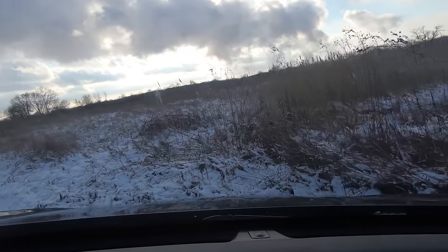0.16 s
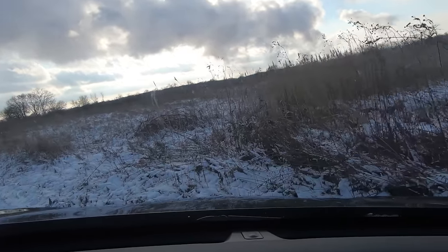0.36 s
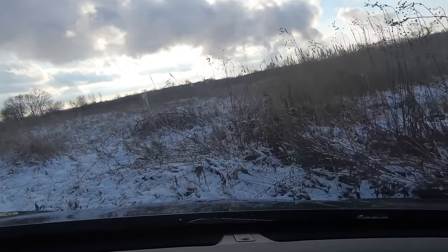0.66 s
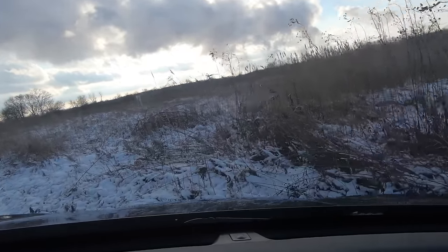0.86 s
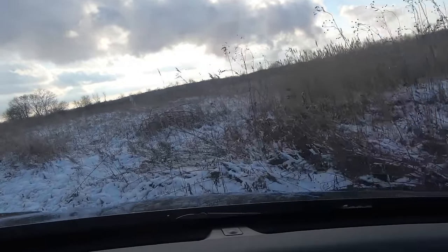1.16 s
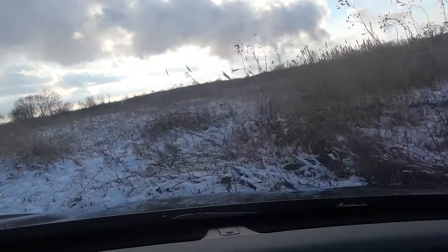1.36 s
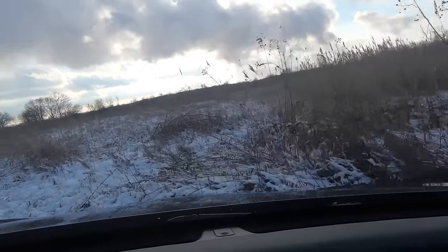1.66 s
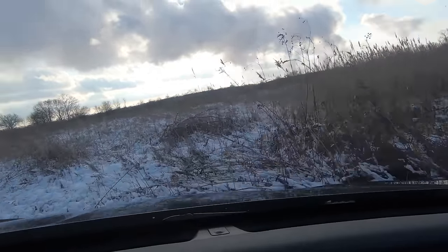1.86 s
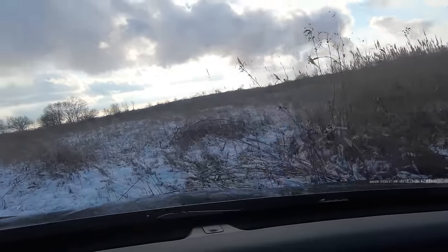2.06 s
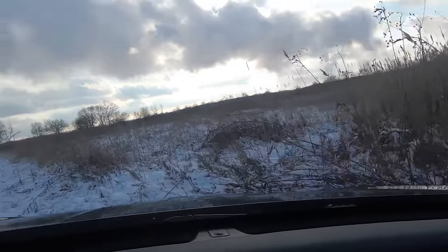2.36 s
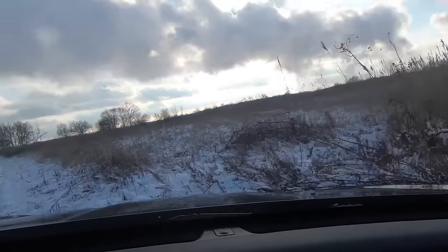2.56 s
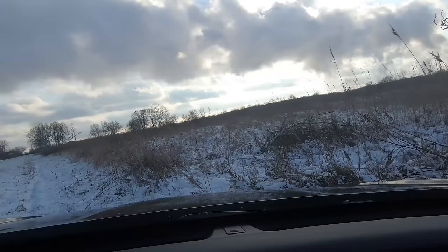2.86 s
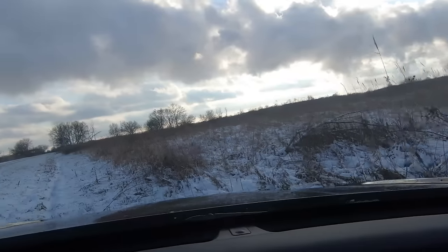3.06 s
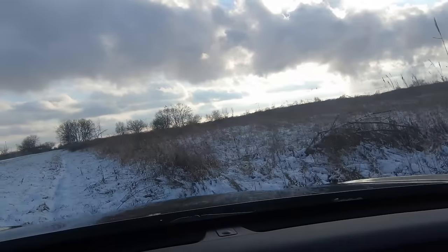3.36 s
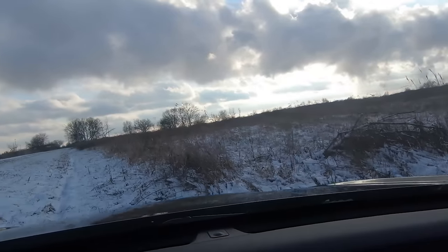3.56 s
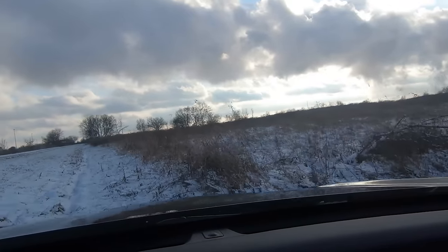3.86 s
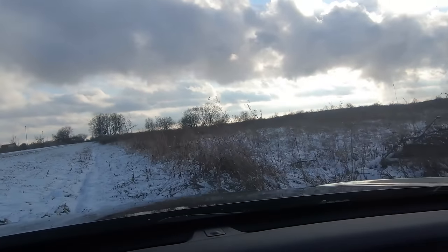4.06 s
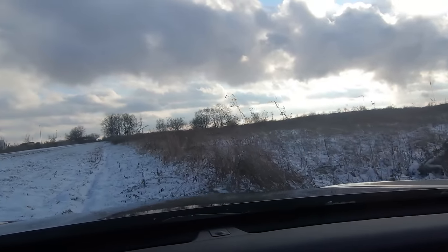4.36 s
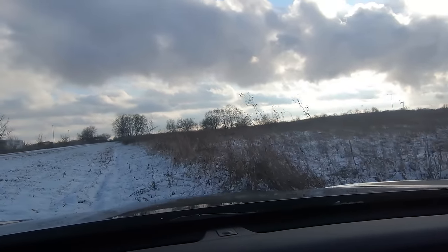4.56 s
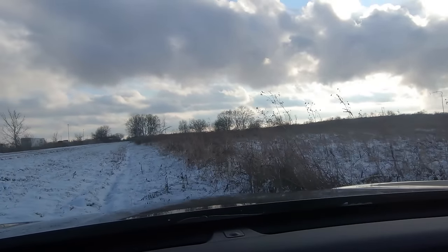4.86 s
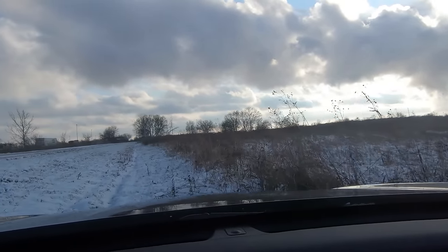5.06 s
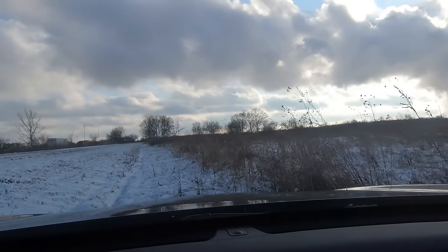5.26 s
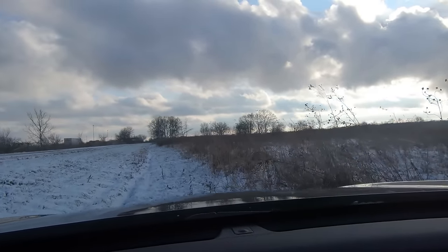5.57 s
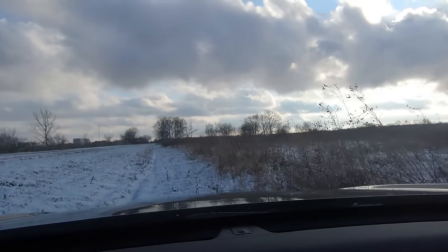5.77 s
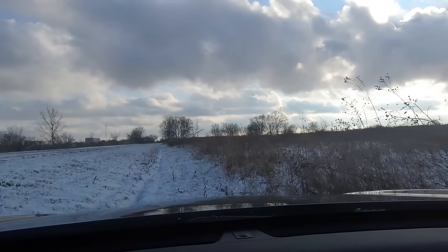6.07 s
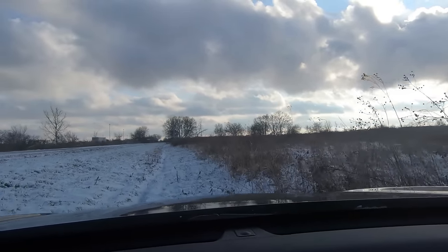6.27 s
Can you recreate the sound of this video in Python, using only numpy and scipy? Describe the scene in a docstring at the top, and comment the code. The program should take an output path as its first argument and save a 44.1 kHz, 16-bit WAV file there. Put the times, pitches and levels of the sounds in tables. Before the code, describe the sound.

Low engine drone and cab rumble as a vehicle creeps through snowy scrub, dry stalks rubbing, then a cluster of hard cracks before it calms.

```python
"""First the low drone of an engine, inside a truck cab creeping over a snowy, weedy track. Crank-order sines
make the drone; shaped noise makes the boom of the cab, the body rumble, the crunch and the swish along the panels.
Over it stalks rub and squeak, bumps ring body modes, and stems crack and tap as noise bursts into panel modes.
Two close microphone ports; taps, squeaks and rubbing are dulled above 8 kHz, all sound is cut above 15.6 kHz."""
import sys
import numpy as np
from scipy import signal
from scipy.fft import rfft, irfft, next_fast_len
from scipy.io import wavfile

SR = 44100
rng = np.random.default_rng(int(sys.argv[2]) if len(sys.argv) > 2 else 0)


def materialize(psi):
    """Save the field psi as 16-bit PCM at rate SR to the path in sys.argv[1].

    A 1-D psi becomes a single channel; in a 2-D psi each row is a channel.
    """
    bounded = np.clip(np.atleast_2d(psi).T, -1, 1)
    quanta = np.round(bounded * 32767).astype(np.int16)
    wavfile.write(sys.argv[1], SR, quanta)


N = 283122   # length in samples
OPPOSITE = np.array([[1], [-1]])   # left port plus, right port minus


def amp(db):
    """Decibels to gain."""
    return 10 ** (np.asarray(db) / 20)


def rms_one(x):
    """Scale to unit rms."""
    return x / np.sqrt(np.mean(x ** 2) + 1e-20)


def power_sum(*levels_db):
    """Level in dB of unrelated sounds heard together: their powers add."""
    return 10 * np.log10(sum(amp(2 * db) for db in levels_db) + 1e-20)


def in_time(rows):
    """Columns of a curve table whose first column is seconds, one value per sample."""
    seconds, *columns = np.transpose(rows)
    return [np.interp(np.arange(N) / SR, seconds, column) for column in columns]


def at_hz(points, hz):
    """Read a table on a log-frequency axis."""
    table_hz, values = np.transpose(points)
    return np.interp(np.log(hz), np.log(table_hz), values)


def drift(rate_hz):
    """Slow random wander of spread 1: noise through two equal poles, made at every 40th sample."""
    step = 40
    r = np.exp(-2 * np.pi * step * rate_hz / SR)
    noise = rng.standard_normal(N // step + 2002)
    slow = signal.lfilter([1], [1, -2 * r, r * r], noise)[2000:]   # skip the filter's start
    return np.interp(np.arange(N) / step, np.arange(len(slow)), rms_one(slow))


def resonance(x, hz, width_hz):
    """Two-pole peak with gain 1 on top."""
    r = np.exp(-np.pi * width_hz / SR)
    top = np.array([1, 0, -1]) * (1 - r * r) / 2
    return signal.lfilter(top, [1, -2 * r * np.cos(2 * np.pi * hz / SR), r * r], x)


def spread(mid, side, alike):
    """Mix two unrelated signals into two ports with the given likeness, -1 to 1."""
    return np.sqrt(1 + alike) * mid + np.sqrt(1 - alike) * side * OPPOSITE


def common_share(alike, spectrum, hz, inside):
    """Share of the power that is left in the mean of the two ports."""
    power = amp(2 * at_hz(spectrum, hz)) * inside
    return np.sum(power * (1 + alike) / 2) / np.sum(power)


# Likeness of the two microphone ports. Each row: pitch in Hz, left-right likeness from -1 to 1.
PORT_LIKENESS = [(60, 1), (99, 0.96), (160, 0.86), (270, 1), (450, 0.8), (740, 0.21), (1220, -0.39),
                 (2010, 0.41), (3330, 0.36), (5500, 0.12), (9080, -0.2), (15000, 0.0068)]
# Balance of the two ports. Each row: pitch in Hz, left minus right in dB.
PORT_TILT = [(60, -0.5), (240, -0.5), (480, -0.5), (950, -1.5), (1890, -2.5), (3770, -4), (6500, 0),
             (8300, -5.5), (10000, -3), (12000, -3), (15000, 0)]


def textured(spectrum, grain_db, grains_per_s):
    """Coloured stereo noise in uneven grains, scaled so that the mean of the ports has an rms of about 1."""
    size = next_fast_len(N)
    hz = np.maximum(np.arange(size // 2 + 1) * SR / size, 1)
    grains = rng.standard_normal((2, N)) * amp(grain_db * drift(grains_per_s))
    mid, side = rfft(grains, size)
    alike = np.clip(at_hz(PORT_LIKENESS, hz), -.99, .999)
    inside = (hz >= spectrum[0][0]) & (hz <= spectrum[-1][0])
    colour = amp(at_hz(spectrum, hz) + at_hz(PORT_TILT, hz) / 2 * OPPOSITE) * inside
    pair = irfft(spread(mid, side, alike) * colour, size)[:, :N]
    return rms_one(pair) / np.sqrt(common_share(alike, spectrum, hz, inside))


def whine():
    """A faint narrow whine: noise through two equal resonances, opposite in the two ports."""
    hz, width_hz, level_db = 1245, 30, -69
    tone = resonance(rng.standard_normal(N), hz, width_hz)
    tone = resonance(tone, hz, width_hz)
    return amp(level_db) * rms_one(tone) * OPPOSITE


# Engine speed. Each row: time in seconds, crank turns per second.
CRANK_SPEED = [(0, 28.5), (.5, 28), (1, 26.9), (1.3, 27.4), (1.6, 30.3), (2, 31.7), (2.4, 33.5),
               (2.8, 35.7), (3.2, 34.8), (3.6, 34.8), (4.2, 34.2), (4.7, 33.6), (5.2, 32.6), (5.8, 32),
               (6.42, 30.8)]
# Engine load. Each row: time in seconds, level in dB.
ENGINE_LOAD = [(0, -35), (.7, -35), (1.3, -40), (1.8, -37.5), (2.2, -37), (2.8, -34.5), (3.4, -36.5),
               (4.2, -39), (5, -39), (5.7, -39.5), (6.42, -42)]
# Engine orders. Each row: multiple of the crank rate, level in dB against the load.
ENGINE_ORDERS = [(1, -4), (2, -3), (3, -2), (4, -1.5), (6, -6.5), (7, -15), (8, -16)]


def engine():
    """Sines on the crank orders, each swelling on its own as the mounts pass it on unevenly."""
    (turns_per_s,), (load_db,) = in_time(CRANK_SPEED), in_time(ENGINE_LOAD)
    unsteady = turns_per_s * (1 + 0.0027 * drift(2.62))
    angle = 2 * np.pi * np.cumsum(unsteady) / SR
    drone = np.zeros(N)
    for order, db in ENGINE_ORDERS:
        swell = amp(load_db + db + 3.04 * drift(1.2))
        drone += swell * np.sin(order * angle + rng.uniform(0, 2 * np.pi))
    return drone


# Lurches of the truck over ruts. Each row: middle in seconds, added boom in dB before the boom trim,
# added rumble in dB.
RUTS = [(0.069, -23.5, -41), (.37, -24, -39), (.85, -47, -63), (1.121, -31, -46), (1.64, -21.5, -57),
        (2.06, -19, -37), (2.34, -21, -51), (2.49, -27, -35.5), (3.159, -45, -27.5), (3.25, -14.5, -35.5),
        (3.55, -21.5, -34), (3.81, -24, -36), (3.91, -39, -32.5), (4.06, -28, -33), (4.44, -21, -47),
        (4.62, -23, -59), (5.49, -43, -58), (5.73, -46, -45), (5.82, -40, -34.5), (6.03, -37, -34.5),
        (6.22, -40, -46)]


def lurches():
    """Each rut swells and fades as a bell: boom and rumble levels in dB."""
    half_width_s = 0.051
    seconds, *levels_db = np.transpose(RUTS)
    bells = np.exp(-((np.arange(N) / SR - seconds[:, None]) / half_width_s) ** 2)
    return 10 * np.log10(amp(2 * np.array(levels_db)) @ bells + 1e-20)


# Ground under the wheels, slow part. Each row: time in seconds, cab boom in dB before the boom trim,
# body rumble in dB, snow crunch in dB.
GROUND_LEVELS = [(0, -31.5, -38.5, -52.5), (.5, -31, -37.5, -52.5), (1, -25.5, -34, -49.5),
                 (1.5, -30, -41, -53), (1.9, -36, -31, -51.5), (2.3, -30, -35, -50), (2.63, -27, -31, -48),
                 (2.8, -29, -31, -44.5), (3, -31.5, -33, -53), (3.4, -24.5, -36, -51), (4, -26, -36.5, -52),
                 (4.4, -29, -35.5, -50), (4.8, -29.5, -32, -52), (5.4, -29, -37.5, -50),
                 (5.9, -34, -34, -55), (6.42, -25, -40, -50)]
# Colours of boom, rumble and crunch. Each row: pitch in Hz, relative density in dB per Hz.
BOOM_COLOUR = [(7.1, -35), (12, -20), (32, -4.5), (45, -2), (59, 7.5), (70, 2), (95, -8.5), (120, -50),
               (210, -120)]
RUMBLE_COLOUR = [(44, -37), (75, 2.5), (92, -8), (129, -4), (156, -6.5), (189, -7.5), (250, -15.5),
                 (323, -21.5), (355, -21.5), (380, -35.5), (490, -46), (840, -120)]
CRUNCH_COLOUR = [(180, -51), (300, 5.5), (318, -8), (355, -0.5), (387, -3), (1080, -15), (1700, -24.5),
                 (2210, -72), (3740, -120)]
# Narrow modes of the truck body. Each row: pitch in Hz, width in Hz, relative level in dB.
BODY_MODES = [(33.8, 4.4, -13), (62.37, 8.7, -0.5), (107.7, 8.2, -4), (187.7, 9.7, -11),
              (220.1, 4.8, -19.5)]
BOOM_TRIM_DB, BODY_DB, LURCH_CRUNCH_DB = -5.5, -38.0, -14   # the last is against the lurch rumble


def ground():
    """The rolling wheels shake the cab air and the body; packed snow crunches above."""
    boom_db, rumble_db, crunch_db = in_time(GROUND_LEVELS)
    lurch_boom_db, lurch_rumble_db = lurches()
    boom_db = power_sum(boom_db, lurch_boom_db) + BOOM_TRIM_DB
    rumble_db = power_sum(rumble_db, lurch_rumble_db)
    crunch_db = power_sum(crunch_db, lurch_rumble_db + LURCH_CRUNCH_DB)
    shake = rng.standard_normal(N)
    modes = np.zeros(N)
    for hz, width_hz, db in BODY_MODES:
        ringing = resonance(resonance(shake, hz, width_hz), hz, width_hz)
        modes += amp(db) * rms_one(ringing)
    return (amp(boom_db) * textured(BOOM_COLOUR, 0.66, 17.0)
            + amp(rumble_db) * textured(RUMBLE_COLOUR, 1.73, 15.0)
            + amp(crunch_db) * textured(CRUNCH_COLOUR, 1.7, 31.0)
            + amp(BODY_DB) * rms_one(modes))


# Weeds and powder along the panels, slow part. Each row: time in seconds, rasp in dB, swish in dB.
BRUSH_LEVELS = [(0, -56.5, -59.5), (.25, -59, -61.5), (.48, -55.5, -58), (.79, -48.5, -51),
                (1.25, -58, -62.5), (1.42, -62, -63.5), (1.96, -57, -58.5), (2.25, -56.5, -54),
                (2.32, -57, -61.5), (2.55, -55, -62), (2.66, -56, -65), (2.73, -54.5, -70),
                (2.8, -48.5, -73), (2.9, -52.5, -59.5), (3.0, -54.5, -58), (3.1, -56.5, -68),
                (3.17, -57, -75), (3.24, -53, -65), (3.32, -56, -55), (3.5, -59, -55.5), (4.02, -53.5, -48),
                (4.3, -60, -64.5), (4.45, -64, -73), (4.66, -63.5, -74), (4.88, -55.5, -56),
                (5.12, -56.5, -58), (5.43, -58.5, -64), (5.8, -61, -72), (6.13, -62, -70),
                (6.42, -58.5, -69)]
# Clumps of weeds sweeping past. Each row: start in seconds, length in seconds, sheen at the start in dB,
# sheen at the end in dB, rasp and swish against the sheen in dB.
CLUMPS = [(.3, 0.054, -60, -56.5, -16), (0.591, 0.63, -56, -68.5, 1), (1.026, 0.041, -51, -54, -2),
          (1.448, 0.17, -56, -54, -6), (1.718, 0.19, -54.5, -50.5, -1.5), (3.364, 0.35, -60.5, -65, 4.5),
          (3.682, 0.25, -58, -59, 2.5), (3.891, 0.17, -52, -54, -1.5), (4.172, 0.009, -55, -66, 4),
          (4.31, 0.06, -64.5, -62.5, -2.5), (4.937, 0.077, -75, -57, -10), (5.152, .16, -69.5, -67.5, 9.5),
          (5.505, 0.17, -70, -68.5, 7.5), (5.912, 0.095, -72, -66, 3), (6.158, 0.3, -72.5, -70.5, 6.5)]
# Colours of rasp, swish and sheen, coarse to fine. Each row: pitch in Hz, relative density in dB per Hz.
RASP_COLOUR = [(760, -9.5), (1300, -1), (1740, -4.5), (2600, -4), (3400, -7), (3670, -11.5), (5000, -21.5),
               (6500, -20), (11000, -120)]
SWISH_COLOUR = [(2470, -21.5), (4200, -7), (6150, -6), (8770, -3), (9260, -9), (11000, -21), (12600, -22),
                (15400, -35)]
SHEEN_COLOUR = [(4200, -26), (5600, -9.5), (6800, -3), (8000, -2), (9000, -8), (9600, -10.5), (11000, -21),
                (12600, -21), (15400, -34)]


def brushing():
    """Fine grains of snow and leaf slide along the panels; each clump comes on fast, lasts and lets go."""
    attack_s, release_s = 0.018, 0.055   # each spans 20 dB
    rasp_db, swish_db = in_time(BRUSH_LEVELS)
    t = np.arange(N) / SR
    sheens_db, coarse_db = [], []
    for start, length, start_db, end_db, against_sheen_db in CLUMPS:
        corners = [start - attack_s, start, start + length, start + length + release_s]
        levels = [start_db - 20, start_db, end_db, end_db - 20]
        sheen_db = np.interp(t, corners, levels, left=-120, right=-120)
        sheens_db.append(sheen_db)
        coarse_db.append(sheen_db + against_sheen_db)
    return (amp(power_sum(rasp_db, *coarse_db)) * textured(RASP_COLOUR, 0.91, 46.0)
            + amp(power_sum(swish_db, *coarse_db)) * textured(SWISH_COLOUR, 0.58, 78.0)
            + amp(power_sum(*sheens_db)) * textured(SHEEN_COLOUR, 1.0, 60.0))


# Rubbing that slides in pitch. Each row: start in seconds, end in seconds, start pitch in Hz, end pitch in Hz,
# level in dB before a 3 dB trim and the cab, half width in Hz.
RUBS = [(0.595, 0.69, 960, 1300, -52.5, 60), (0.68, 0.84, 1350, 1600, -55.5, 60),
        (.57, .69, 2200, 2300, -59, 80), (0.941, 0.984, 1280, 1200, -41.5, 130),
        (.982, 1.013, 2640, 2620, -48, 40), (1.021, 1.073, 2660, 2600, -46, 40),
        (0.964, 1.001, 3150, 3050, -49, 50), (1.021, 1.061, 3470, 3430, -46, 45),
        (0.96, 1.051, 830, 1030, -45, 70), (1.044, 1.085, 1150, 1600, -43, 70),
        (1.067, 1.087, 1850, 2050, -48, 120), (3.07, 3.2, 200, 340, -35, 60),
        (3.1, 3.21, 650, 950, -50, 150)]


def glides():
    """Narrow noise riding a moving carrier, swelling and fading over each stroke."""
    out = np.zeros((2, N))
    for start, end, start_hz, end_hz, db, half_width_hz in RUBS:
        i, j = round(start * SR), round(end * SR)
        angle = 2 * np.pi * np.cumsum(np.linspace(start_hz, end_hz, j - i)) / SR
        mid, side = [drift(half_width_hz)[i:j] * np.sin(angle) + drift(half_width_hz)[i:j] * np.cos(angle)
                     for _ in range(2)]
        alike = np.clip(at_hz(PORT_LIKENESS, start_hz), -1, 1)
        swell = amp(db - 3) * np.sqrt(np.sin(np.linspace(0, np.pi, j - i)).clip(0))
        out[:, i:j] += swell * spread(mid, side, alike)
    return out


# Stalks dragged along a panel. Each row: start in seconds, length in seconds, drive in dB of the low, middle
# and high squeaks, height at the start as a share of the end (before a power of 1.5).
STALKS = [(0.939, 0.069, -46, -52.5, -52, 0.94), (1.019, 0.055, -50.5, -54.5, -55.5, 1),
          (1.08, 0.021, -58, -59, -70, 0.87), (2.286, 0.045, -53.5, -73, -78, 0.88),
          (2.448, 0.035, -53, -54.5, -62, 0.76), (2.825, 0.023, -71, -58, -77, .9),
          (3.094, 0.13, -55.5, -61, -78, 0.99), (3.794, 0.024, -44, -77, -74, 0.82),
          (3.879, 0.046, -45.5, -56, -73, 0.94), (4.875, 0.11, -58.5, -47, -56, .05),
          (4.96, 0.034, -70, -56, -49, .3), (5.708, 0.016, -71, -62, -80, 0.73),
          (5.783, 0.078, -65, -64, -76, 0.93), (5.861, 0.045, -63, -64, -80, 0.66),
          (5.999, 0.06, -64, -67.5, -76, 0.86), (6.188, 0.042, -67, -74, -68, 1),
          (6.263, 0.045, -55.5, -64, -74, 0.92), (6.364, 0.048, -64, -73, -59.5, 0.58)]
# Squeak modes. Each row: pitch in Hz, width in Hz, gain in dB.
SQUEAK_MODES = [(686, 260, -5), (897, 110, -1.5), (1217, 57, 0), (1470, 47, -3), (2100, 140, 0.5),
                (2620, 440, -1.5), (2960, 230, -0.5), (3200, 200, -4.5), (4100, 1400, 4.5),
                (5940, 1400, 0.5), (6770, 440, -3.5), (7260, 300, -3)]


def drags():
    """Uneven stick-slip noise into squeak modes; most strokes grow, then stop short as the stalk lets go."""
    t, out = np.arange(N) / SR, np.zeros((2, N))
    slips = rng.standard_normal((2, N)) * amp(1.5 * drift(110.0))
    low_pass = signal.butter(4, 1700, fs=SR, output="sos")   # the low squeaks fade above 1700 Hz
    slips = [signal.sosfilt(low_pass, slips), slips, slips]
    strokes = []
    for start, length, *_, share in STALKS:
        corners = [start - .002, start + 0.0023, start + length, start + length + 0.011]
        strokes.append(np.interp(t, corners, [0, share, 1, 0]) ** 1.5)
    levels = amp(np.array(STALKS)[:, 2:5]).T @ np.array(strokes)
    for hz, width_hz, db in SQUEAK_MODES:
        group = np.searchsorted([1700, 4000], hz)   # low, middle, high
        wavering = amp(db + 2.0 * drift(6.3))
        out += wavering * levels[group] * rms_one(resonance(slips[group], hz, width_hz))
    return out


# Bumps. Each row: start in seconds, peak in dB, pitch in Hz, time to die by 60 dB in seconds.
BUMP_BLOWS = [(0.654, -16.5, 68.9, 0.33), (0.736, -14, 64, 0.053), (0.824, -19, 61.2, 0.041),
              (.945, -26, 254.3, 0.2), (1.253, -9, 209, 0.064), (1.254, -19, 354, 0.069),
              (1.257, -26, 239, 0.072), (2.03, -32.5, 220, 0.36), (2.592, -15.5, 104.2, 0.12),
              (3.195, -22.5, 153, .07), (3.22, -20.5, 35, 0.49), (3.793, -36.5, 1457, 0.064),
              (3.824, -17, 106, 0.079), (3.89, -37, 1410, .05), (4.04, -17.5, 62, 0.11),
              (5.722, -42.5, 637, 0.13), (5.795, -40.5, 575, 0.18), (5.8, -26.5, 187.6, 0.27),
              (5.81, -48, 884, 0.23), (6.016, -33, 280, 0.17), (6.07, -53, 1530, 0.098),
              (6.2, -50, 1480, .1), (6.215, -44.5, 627, 0.1)]


def bumps():
    """A soft blow swells over 2.41 cycles and rings one body mode, for at most 0.2 s."""
    out, t = np.zeros(N), np.arange(SR // 5) / SR
    for start, db, hz, t60 in BUMP_BLOWS:
        i, rise = round(start * SR), 2.41 / hz
        decay = amp(db - 60 * np.maximum(t - rise, 0) / t60)
        ring = decay * np.minimum(t / rise, 1) * np.sin(2 * np.pi * hz * t)
        out[i:i + len(t)] += ring[:N - i]
    return out


# Stems on the panels. Each row: start in seconds, drive in dB of the middle, thud, hollow and bright parts,
# pan (left minus right) in dB, pitch of the snap in Hz.
STEMS = [(1.195, -43, -62, -51, -41, -1, 3200), (1.2475, -37.5, -22, -55, -45, -2, 3500),
         (1.256, -37.5, -34, -40.5, -52, 0, 2800), (1.264, -41, -42, -44, -49, 3, 3200),
         (1.712, -40, -60, -53, -50, 0, 3800), (2.2935, -36.5, -30, -41, -59, -1, 2800),
         (2.3416, -42, -41, -47, -60, -4, 2400), (2.3766, -33, -47, -44, -45, -2.5, 2480),
         (2.411, -30.5, -54, -37.5, -38, 1.5, 2530), (2.4556, -41, -50, -43, -36, 1, 2300),
         (2.4717, -40, -40, -41, -54, 9, 2200), (2.508, -24.5, -28, -32.5, -31.5, 0, 2960),
         (2.518, -33, -45, -47, -50, -1, 3800), (2.557, -50, -50, -51, -60, -3, 2200),
         (2.584, -52, -60, -56, -55, 0, 2500), (2.609, -43, -58, -59, -62, -2, 2300),
         (2.6363, -18, -15, -30.5, -43, 2, 3200), (2.654, -29.5, -40, -39, -50, -2, 2800),
         (2.677, -25.5, -32, -55.5, -45, 0, 2680), (2.6925, -32, -48, -50, -39, 2, 3100),
         (2.739, -34.5, -37, -57, -70, 9, 2670), (2.768, -45, -55, -55, -65, 7, 3400),
         (2.796, -13.5, -34, -42, -28, 3, 3660), (2.809, -32, -48, -43, -46, 3, 3000),
         (2.834, -22.5, -45, -37, -37, -1, 2570), (2.856, -32, -50, -54, -60, 3, 2900),
         (2.8677, -31.5, -42, -54, -54, 4, 3100), (2.8744, -36, -48, -55, -40, 3, 3300),
         (2.897, -34, -45, -51, -47, 7, 3400), (2.9547, -36.5, -41, -49, -52, 6, 3000),
         (3.013, -30.5, -40, -42, -37.5, 5, 3120), (3.05, -38, -54, -56, -48, 5, 2800),
         (3.070, -39.5, -50, -63, -41, 5, 2800), (3.11, -39, -55, -52, -50, 3, 2900),
         (3.133, -39, -40, -42, -45, 2, 2900), (3.146, -52, -55, -55, -54, 5, 4200),
         (3.1719, -33, -41, -42, -43, 8.5, 2900), (3.181, -36, -44, -34.5, -38, 1, 2900),
         (3.1922, -16.5, -29, -36.5, -23.5, 1.5, 3130), (3.252, -39, -50, -55, -47, 7, 2700),
         (3.273, -38, -50, -59, -39, -4, 2800), (3.2838, -26.5, -34, -36.5, -29.5, 2, 3000),
         (3.32, -35.5, -45, -48, -58, 5, 2800), (3.347, -36.5, -54, -55, -55, 0, 2700),
         (3.6888, -38, -53, -40.5, -54, 4, 2800), (3.792, -55, -30.5, -34, -60.5, 9, 2200),
         (3.892, -45, -33, -38, -57, -8, 2800), (3.926, -46, -33, -48, -60, -1, 2800),
         (3.944, -58, -46, -57, -62, 4, 2800), (4.0162, -36, -48, -39, -53, 5, 2100),
         (4.168, -40, -50, -47.5, -58, -9, 3500), (4.4356, -51, -56, -45.5, -66.5, -4, 2800),
         (5.7202, -50, -34.5, -58, -68, 3, 2800), (5.7959, -53, -31, -56, -69.5, 4, 2800),
         (5.923, -43, -37, -58, -56, 1, 3800), (6.014, -41, -32.5, -43, -65, 4, 2800),
         (6.0711, -58, -39, -60, -72, 5, 2800), (6.2103, -61, -31, -43, -60, 2, 2800),
         (6.2886, -48, -33, -44, -70, -2, 2200), (6.346, -38.5, -61, -50, -53, -1, 2800)]
# Panel modes. Each row: pitch in Hz, width in Hz, gain in dB.
PANEL_MODES = [(297, 50, 21), (483, 260, 18), (609, 236, 19), (856, 190, 21.5), (1227, 87, 24.5),
               (1536, 180, 21), (2030, 550, 4.5), (2330, 610, 7.5), (2890, 650, 6), (3355, 167, 6.5),
               (3780, 234, 1), (4520, 800, 14), (5360, 800, 14), (5660, 610, 13.5), (7000, 1280, 10.5),
               (8100, 1400, 8)]
SOFT_T60_S, HARD_T60_S = 0.058, 0.03   # a light touch rings on, a hard snap is short
BRIGHT_T60_S = 0.14   # extra decay: the bright part dies sooner
HOLLOW_WEIGHT_DB = -19   # the hollow part counts this much less towards hardness
SNAP_SPREAD = .9   # width of a snap's colour as a share of its pitch
CRACK = 5.0   # height of the single click in a hard snap, against the noise around it
HOLLOW_LAG, BRIGHT_LAG = 14, 6   # later arrival at the right port, samples


def taps():
    """Each stem gives a dying burst of noise, with a crack if hard, that rings four groups of panel modes."""
    thuds, hollows, middles, brights = drive = np.zeros((4, 2, N))
    t = np.arange(SR // 5) / SR
    for start, mid_db, thud_db, hollow_db, bright_db, pan_db, snap_hz in STEMS:
        i = round(start * SR)
        burst = rng.standard_normal(len(t))
        # weak touches start softly and do not crack
        hard = np.clip((max(mid_db, hollow_db + HOLLOW_WEIGHT_DB) + 47.5) / 25, 0, 1)
        t60 = SOFT_T60_S + (HARD_T60_S - SOFT_T60_S) * hard
        onset = 1 - np.exp(-t / (0.00022 + 0.00072 * (1 - hard)))
        decay = 0.6 * hard * amp(-60 * t / 0.009) + .5 * amp(-60 * t / t60)
        snap = burst * onset * decay
        snap[20] += CRACK * hard
        # lows start later and last longer
        thud = 0.32 * burst * (1 - np.exp(-t / 0.002)) * amp(-60 * t / (3.6 * t60))
        # each snap favours the modes near its pitch
        middle = 2 * resonance(snap, snap_hz, SNAP_SPREAD * snap_hz)
        bright = snap * amp(-60 * t / BRIGHT_T60_S)
        pan = amp(pan_db / 2 * OPPOSITE)
        span = slice(i, i + len(t))
        thuds[:, span] += amp(thud_db) * pan * thud[:N - i]
        hollows[:, span] += amp(hollow_db) * pan * snap[:N - i]
        middles[:, span] += amp(mid_db) * pan * middle[:N - i]
        brights[:, span] += amp(bright_db) * pan * bright[:N - i]
    hollows[1] = np.roll(hollows[1], HOLLOW_LAG)
    brights[1] = np.roll(brights[1], BRIGHT_LAG)
    drive += 1e-18   # keeps the filters out of vanishingly small numbers
    out = np.zeros((2, N))
    for k, (hz, width_hz, db) in enumerate(PANEL_MODES):
        group = np.searchsorted([800, 1800, 4500], hz)   # thud, hollow, middle, bright
        out += (-1) ** k * amp(db) * resonance(drive[group], hz, width_hz)   # neighbours alternate in sign
    return out


def cab(x):
    """Trim dulls the top; glass returns a short diffuse tail, unlike in each port."""
    dull_hz, tail_t60_s, tail_db = 8000, 0.06, -4
    t = np.arange(SR // 5) / SR
    tail = rng.standard_normal((2, len(t))) * amp(-60 * t / tail_t60_s) * (t > .002)
    tail = amp(tail_db) * tail / np.sqrt(np.sum(tail ** 2, axis=1, keepdims=True))
    x = signal.sosfilt(signal.butter(3, dull_hz, fs=SR, output="sos"), x)
    return x + signal.fftconvolve(x, tail, axes=1)[:, :N]


def scene():
    """All sources at the two ports; the stalks and stems are heard through the cab."""
    return whine() + engine() + ground() + brushing() + bumps() + cab(glides() + drags() + taps())


def record(dry):
    """A steep low-pass cuts the top above about 15.6 kHz."""
    cutoff_hz = 15600
    return signal.sosfilt(signal.cheby2(16, 60, 1.02 * cutoff_hz, fs=SR, output="sos"), dry)


dry = scene()
out = record(dry)
materialize(out)
```